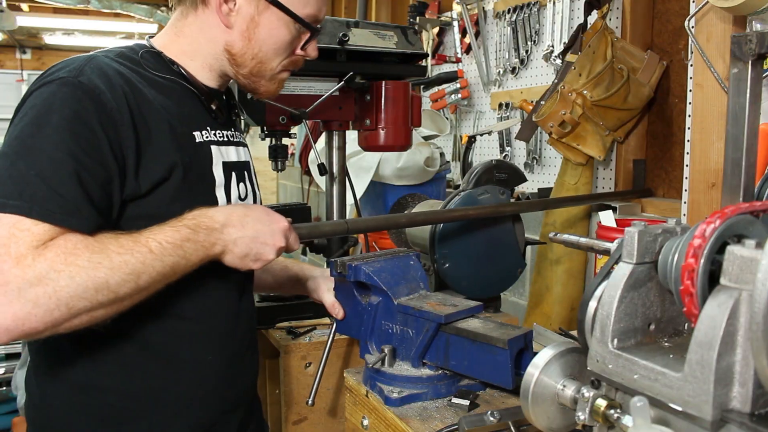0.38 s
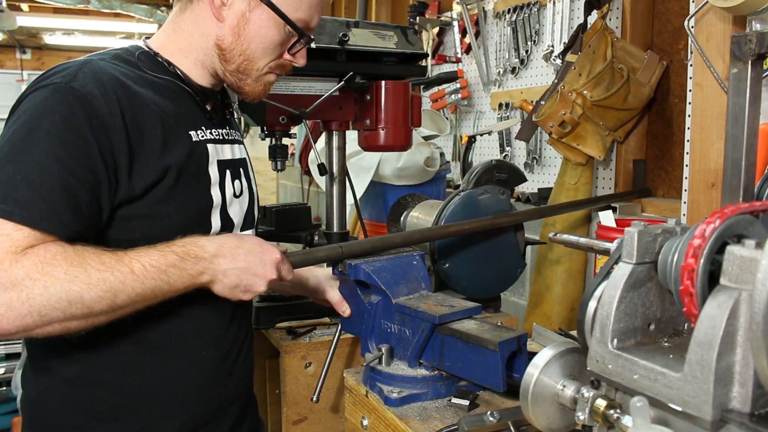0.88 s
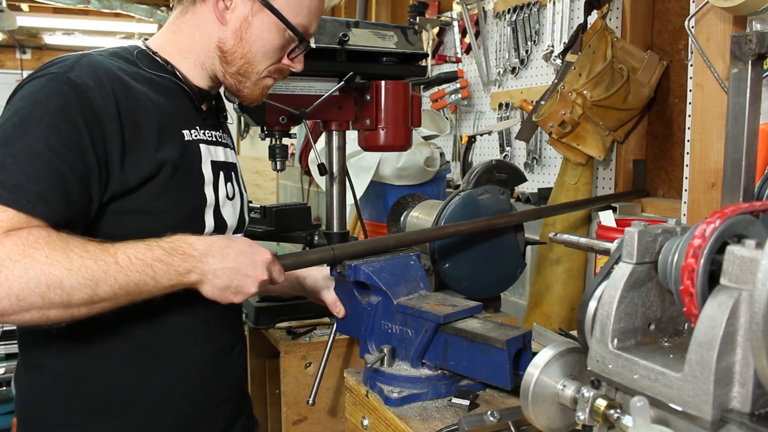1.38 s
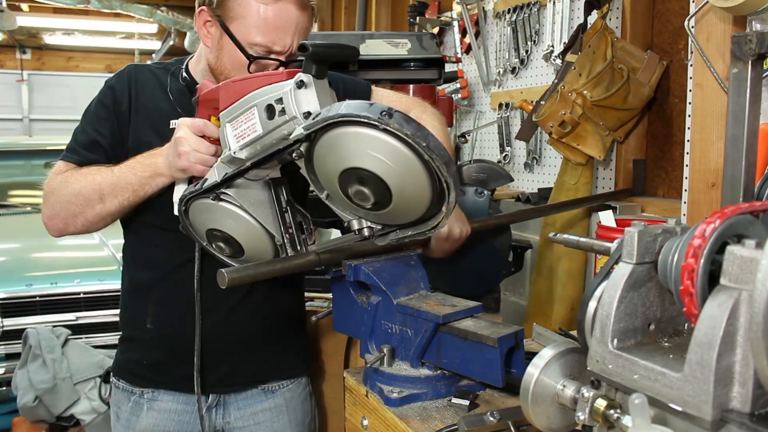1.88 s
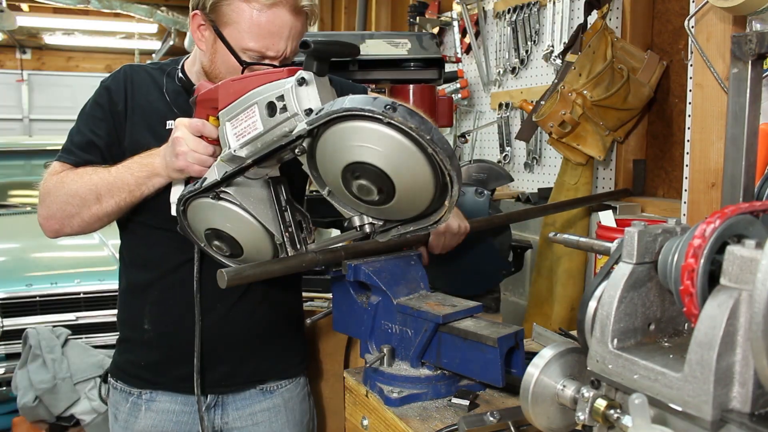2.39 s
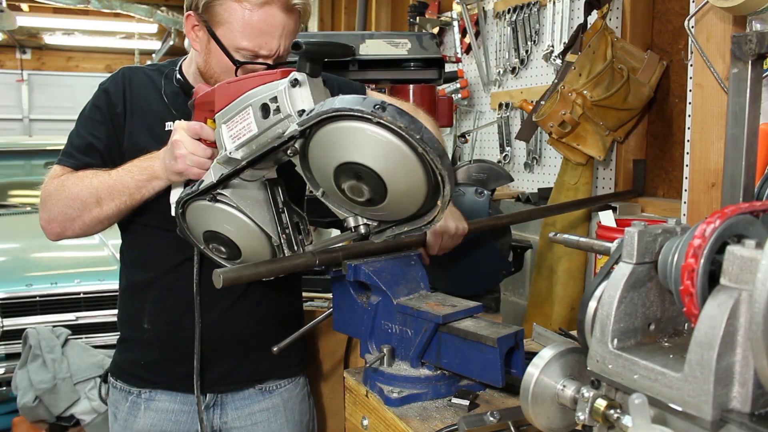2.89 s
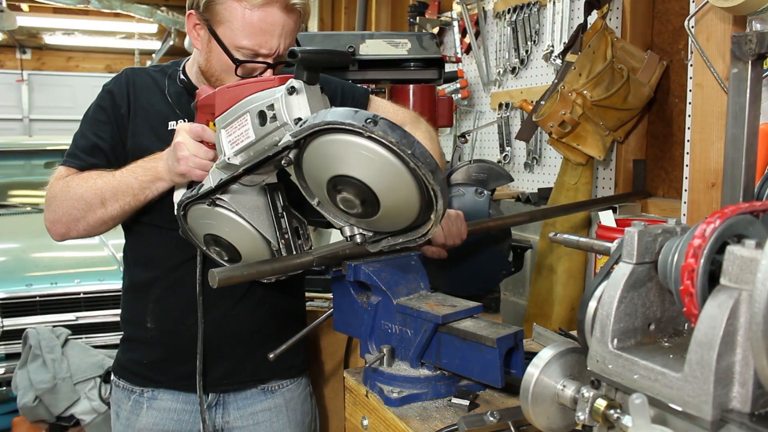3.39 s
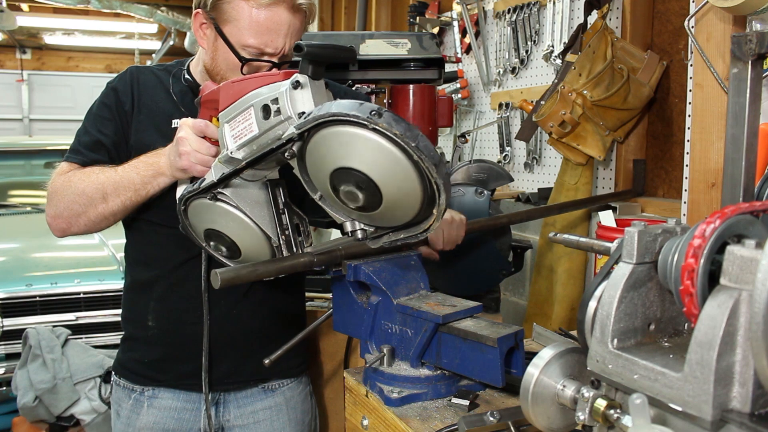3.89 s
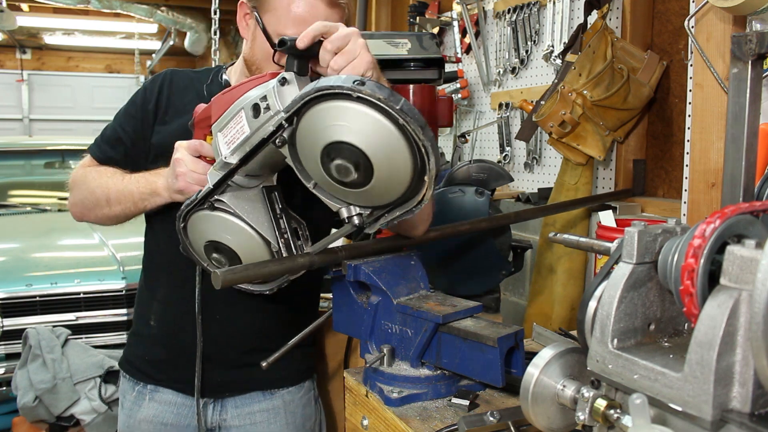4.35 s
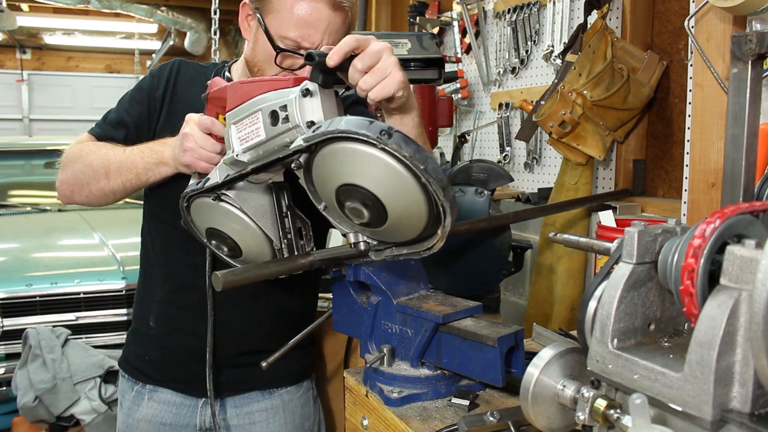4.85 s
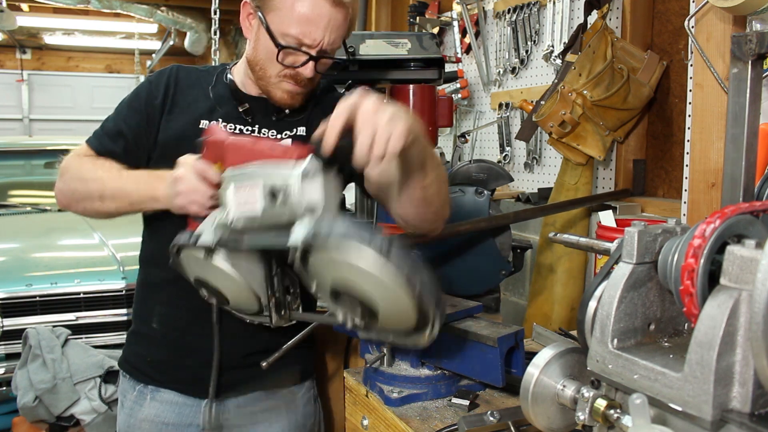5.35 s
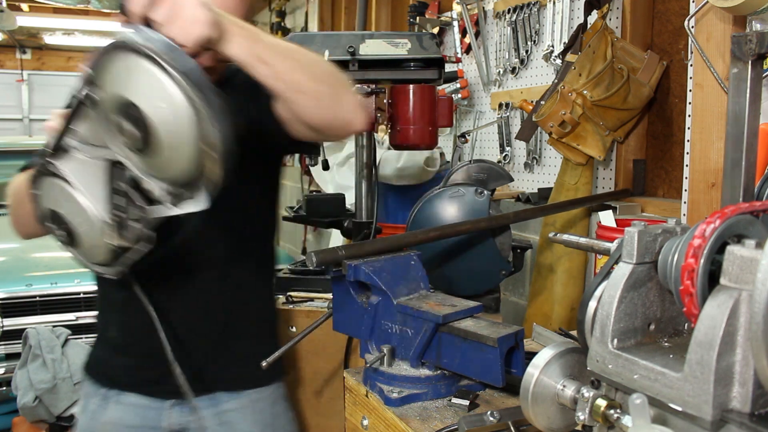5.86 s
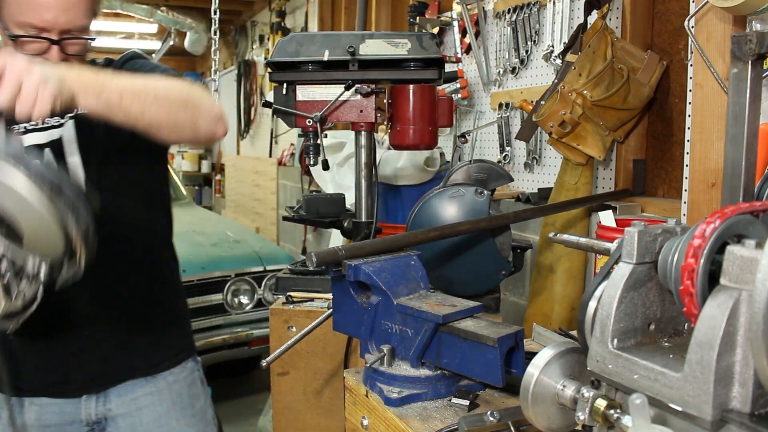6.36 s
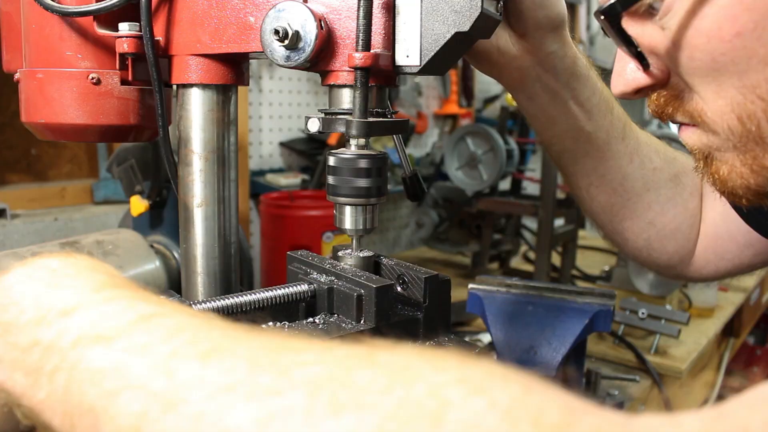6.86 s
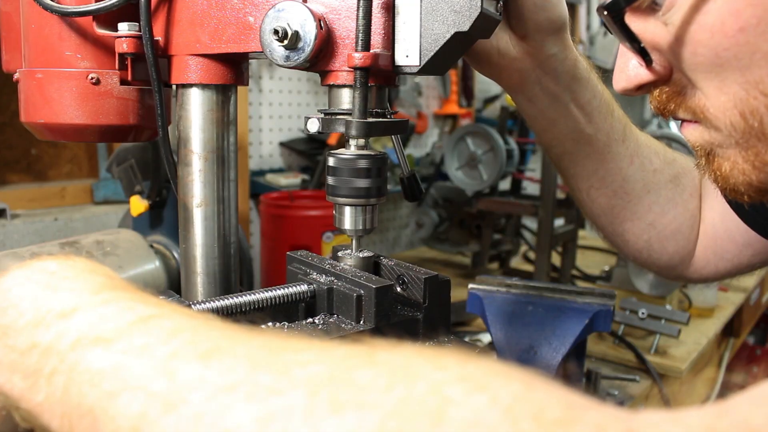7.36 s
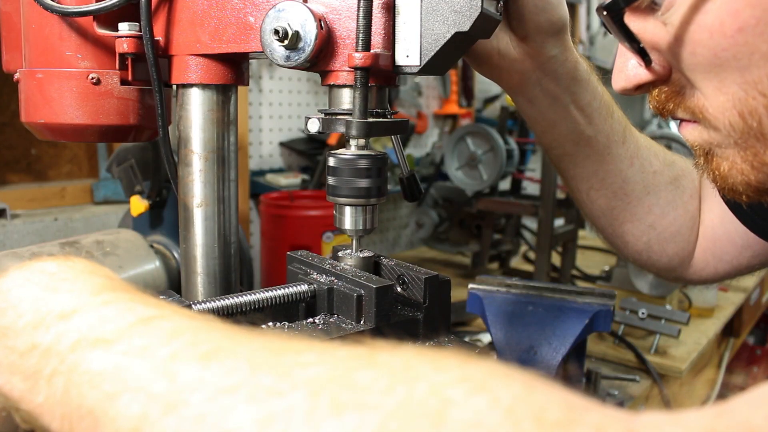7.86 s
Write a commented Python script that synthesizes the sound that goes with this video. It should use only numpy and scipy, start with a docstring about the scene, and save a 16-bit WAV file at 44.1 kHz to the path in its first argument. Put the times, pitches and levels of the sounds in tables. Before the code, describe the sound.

Metal knocks in a quiet workshop, shrill fast-forward sawing, a saw winding down with a ringing bar, then a steady, rapidly ticking drill press.

```python
"""Inside a workshop, four shots joined by hard cuts. First a steel bar slides and knocks in a vise as it is clamped:
damped modes, short noise bursts and the shop's echo. Then a portable band saw cuts it, heard five times too fast:
shaped noise, gliding gear tones and snatches. At normal speed the saw sings, breaks through, is knocked twice and
coasts to rest, its noise bands fading with the speed. Last a drill press drones and ticks once per motor turn.
The microphone drops the deep bass; left and right differ a little in level and share part of each noise."""
import sys
import numpy as np
from scipy import signal
from scipy.fft import rfft, irfft, next_fast_len
from scipy.io import wavfile
from scipy.ndimage import uniform_filter1d, map_coordinates

SR = 44100
rng = np.random.default_rng(int(sys.argv[2]) if len(sys.argv) > 2 else 0)


def store_wav(level_fs):
    """Save 16-bit WAV to argv[1]."""
    pcm = np.round(np.clip(np.atleast_2d(level_fs), -1, 1) * 32767)
    wavfile.write(sys.argv[1], SR, pcm.T.astype(np.int16))


def attenuation_scalar(level_db):
    """Turn a level in dB into a linear amplitude multiplier (20 dB per decade)."""
    decades = np.asarray(level_db, float) / 20
    return 10 ** decades


N = 363384
T = np.arange(N) / SR

# Every *_SPECTRUM is a relative noise shape: pitch_hz, level_db (per Hz).
# Every *_PEAKS holds resonances over such a bed: pitch_hz, width_hz, level_db (relative).

# starts of the four shots: start_s
SHOT_STARTS = [0, 1.888, 4.757, 6.926]
# left minus right in each shot: level_db
LEFT_LEAN = [-2.5, -1.1, -1.2, -1.65]
# how alike left and right are, one list per shot: pitch_hz, correlation (0 to 1)
LIKENESS = [
    [(100, 0.4), (1000, 0.14), (8000, 0.21)],
    [(600, 0.816), (1650, 0.96), (15000, 0.92)],
    [(300, 0.97), (2000, 0.849), (8000, 0.35)],
    [(200, 0.972), (2000, 0.904), (10000, 0.38)],
]
# time the shop's echo takes to die: pitch_hz, t60_s
SHOP_DECAY = [(100, 0.18), (600, 0.25), (3000, 0.19), (12000, 0.18)]
# mains hum, before a common trim: pitch_hz, then level_db in each of the four shots
MAINS_HUM = [(117, -68, -120, -79, -77), (219, -69.5, -120, -87.5, -68), (580, -120, -88.5, -120, -120)]
# shop and microphone hiss
HISS_SPECTRUM = [(12, -24.5), (20, -7), (234, -12.5), (759, -20), (949, -21), (1910, -22), (2080, -23.5),
                 (2320, -23), (2530, -22), (16000, -36)]
# hiss in the first and third shot: level_db
HISS_LEVELS = [-61, -77]

# drill press: belt and casting drone, whirr, tick
DRONE_SPECTRUM = [(18, -89), (30, -77.5), (170, -2), (225, -9), (262, 5), (340, -2.5), (573, -1.5),
                  (802, -3), (1380, -5), (2600, -17), (3380, -28), (5720, -120)]
DRONE_PEAKS = [(264, 6.9, -7), (291, 4.9, 4), (428, 14, 1.5), (475, 19, 1), (594, 55, 2), (643, 106, 1),
               (714, 25, 3), (942, 83, -2.5), (1030, 21, -1), (1375, 88, -3.5), (1745, 43, -7)]
WHIRR_SPECTRUM = [(1290, -40), (2200, -4.5), (2920, 1.5), (3560, -5), (4310, -5), (7900, -11),
                  (8950, -11.5), (10900, -22), (12700, -23), (16000, -40.5)]
WHIRR_PEAKS = [(3650, 400, 4), (4650, 60, -2), (5440, 60, -1)]
TICK_SPECTRUM = [(1500, -120), (3000, 3), (5500, -4), (7500, -4), (10500, -11.5), (16000, -30)]
TICK_PEAKS = [(8050, 150, -4.5), (8250, 80, 3.5), (8550, 90, 5), (8980, 90, 5), (9290, 80, 4),
              (12650, 840, -12.5)]
# the tick comes and goes: time_s, level_db
TICK_LEVELS = [(6.93, -47), (7.1, -50.5), (7.2, -54), (7.34, -51), (7.42, -43.5), (7.62, -46), (7.82, -58),
               (7.885, -40.5), (7.925, -53), (7.95, -40.5), (8.0, -40.5), (8.16, -47), (8.24, -64)]

# bar sliding or screw turning: middle_s, half_length_s, rumble_db (through the bench), scrape_db
STROKES = [(0.049, .16, -53.5, -54.5), (0.627, 0.11, -62.5, -62), (1.024, 0.16, -50, -59),
           (1.3, 0.5, -53.5, -66), (1.57, 0.23, -53.5, -76)]
BENCH_RUMBLE_SPECTRUM = [(40, -31), (90, 5), (150, 7.5), (340, 7), (480, -3.5), (700, -24.5), (1200, -120)]
SCRAPE_SPECTRUM = [(300, -49.5), (600, -11), (900, 3), (1100, -3.5), (1700, -8.5), (2900, -9), (4500, -20),
                   (8000, -60.5)]
# steel on steel: start_s, clank_db, thud_db, treble_slope_db_per_octave, ringing_db (relative to the clank)
KNOCKS = [(0.840, -17, -43, -8.5, -6), (0.845, -18.5, -28, -4.5, -5), (0.859, -15, -22.5, 1.5, -32),
          (0.871, -21.5, -39.5, -6, -15.5), (0.886, -25.5, -48, -6.5, -25), (0.951, -25, -23.5, -5, -12.5),
          (1.112, -49.5, -37.5, -5.5, -12), (1.234, -31, -37, -9, -14), (1.247, -23.5, -45.5, -3.5, -24),
          (1.466, -31.5, -34.5, -9, -15), (1.55, -46, -31.5, -6, -24), (1.711, -25.5, -37, -5.5, -17),
          (5.759, -13.5, -37, -20.5, -18), (5.767, -24.5, -25.5, -4.5, -17.5), (5.778, -29, -30, -6.5, -18),
          (6.006, -23.5, -35, 1, -22), (6.015, -34.5, -63, -0.5, -19), (6.098, -42, -41.5, -4, -16.5)]
# ringing of bar and jaws: pitch_hz, level_db (relative), t60_s
STEEL_MODES = [(560, -3, .1), (752, -3, .09), (1050, -6, .2), (1450, -12, .15), (1597, -4, .16),
               (1916, -15, .15), (2934, -16, .14), (4140, -12, .14), (4365, -15, .32), (5110, -16, .22),
               (5900, -16, .33), (6530, -21, .12)]
# thump of the bench: pitch_hz, level_db (relative), t60_s
BENCH_MODES = [(95, -21, 0.025), (149.7, -6.5, 0.098), (209.2, -5.5, 0.13), (255.8, -1.5, 0.069),
               (339.4, 4.5, 0.044), (436, -4, 0.05)]
CLANK_SPECTRUM = [(120, -60.5), (300, -16), (600, -0.5), (1060, -5), (1570, -7), (2280, -9), (4250, -14.5),
                  (8000, -34), (15000, -54.5)]

# free end of the cut bar, a close pair of modes: start_s, level_db, beat_hz, t60_s
PINGS = [(5.759, -25.5, 7.5, 0.99), (6.004, -19, 12.7, 0.28)]
# saw at normal speed: the singing bar, then wheels, gears and fan
SINGING_SPECTRUM = [(470, -72), (800, -8.5), (898, -7), (1300, 0.5), (1900, -14), (2470, -37), (4180, -120)]
SINGING_PEAKS = [(969, 36, 0), (1077, 10.5, 4.5), (1288, 8, 5), (1358, 21, 2.5), (1590, 12, -5),
                 (1630, 10, 2.5)]
WHEEL_SPECTRUM = [(100, -65), (260, -27), (445, -8.5), (520, -10), (667, 5.5), (822, -5.5), (900, -13.5),
                  (1170, -32.5), (1980, -120)]
GEARBOX_SPECTRUM = [(1030, -78), (1750, -5.5), (2180, -4), (2370, 1.5), (3460, -9.5), (4300, -10),
                    (5590, -27), (9460, -120)]
GEARBOX_PEAKS = [(2053, 30, 1), (2310, 9.6, 18.5), (2460, 27, -9), (2460, 13, 7), (2810, 19, 13),
                 (3050, 30, 6), (3180, 24, 2.5), (3680, 40, -8)]
FAN_SPECTRUM = [(2350, -13), (4000, -1), (4260, -2), (4620, -2.5), (6290, -0.5), (6820, -4), (8400, -5.5),
                (12500, -18), (16000, -34.5)]
# the wheels rock back twice: time_s, level_db
WHEEL_ROCKS = [(6.815, -74), (6.862, -72)]

# fast sawing, the motor sags under load and recovers: time_s, gear_whine_hz
WHINE_PITCH = [(1.9, 4630), (2.13, 4450), (2.25, 4830), (2.47, 5010), (2.62, 4940), (2.72, 5110),
               (2.87, 5020), (2.95, 5120), (3.15, 5150), (3.25, 4920), (3.32, 4630), (3.43, 4610),
               (3.49, 4310), (3.53, 4640), (3.6, 4350), (3.68, 4330), (3.73, 4810), (3.79, 4630),
               (3.85, 4660), (3.92, 5060), (4.06, 4680), (4.14, 5070), (4.3, 5330), (4.42, 5290),
               (4.5, 4620), (4.66, 4520), (4.75, 4580)]
# whine tones: multiple (of the whine pitch), level_db (relative), flicker_db (scales a random curve)
GEAR_ORDERS = [(1.005, 0, 1.5), (2.13, 0, 6), (2.4, -6, 6), (2.76, -6, 6), (3.035, 0, 5)]
# saw resonances that a whine order meets: pitch_hz, width_hz, level_db
WHISTLES = [(5050, 700, -55.5), (9750, 300, -47), (10800, 450, -42), (12250, 250, -37), (13150, 450, -41),
            (14000, 500, -45)]
# blade resonances that squeal: pitch_hz, level_db, loudest_s, span_s (8 dB down this far away)
SQUEALS = [(9900, -52, 2.5, .5), (10350, -47, 2.7, .6), (12250, -45, 2.2, .3), (12700, -47, 3.3, .3),
           (13050, -48, 4.55, .35), (14150, -49, 2.15, .2), (12200, -49, 4.4, .5), (10650, -49, 4.3, .2),
           (6600, -53, 4.2, .4), (13700, -50, 3.0, .5)]
# push of the blade, heard as teeth biting: time_s, level_db (swings are scaled for each layer)
BLADE_PUSH = [(1.92, -39.5), (2.04, -39.5), (2.66, -39), (2.72, -34), (2.83, -40), (2.95, -32.5),
              (3.02, -37), (4.28, -36.5), (4.64, -35.5), (4.75, -39.5)]
# the blade snatches at the bar: start_s, level_db (before the resonances)
SNATCHES = [(1.889, -15), (1.9987, -15), (2.1006, -17.5), (2.1531, -23), (2.1807, -23), (2.211, -15.5),
            (2.3935, -26.5), (2.4953, -25), (2.5942, -25.5), (2.6924, -22.5), (2.745, -22), (2.7818, -18),
            (2.8583, -28), (2.9888, -24), (3.1294, -21), (3.2915, -17), (3.3288, -21), (3.4085, -19.5),
            (3.5446, -18.5), (3.7333, -14), (3.9436, -21), (3.993, -24), (4.05, -25), (4.105, -25)]
# what a snatch shakes: pitch_hz, width_hz, level_db
JOLT_MODES = [(894, 310, -13.5), (1290, 138, -1.5), (2232, 220, 2), (2382, 290, -1.5), (3240, 480, -7.5),
              (4740, 890, -20)]
ROAR_SPECTRUM = [(1590, -62), (2700, -28), (3100, -19.5), (4330, -17), (5570, -12.5), (6420, 1.5),
                 (7420, -8), (9200, -9.5), (12000, -47), (20200, -120)]
ROAR_PEAKS = [(3710, 170, -11.5), (5220, 84, -28.5), (5520, 560, -6), (7040, 290, -2), (7860, 160, -2.5),
              (8440, 160, 0)]
TEETH_SPECTRUM = [(7000, -51), (8800, -21.5), (9800, -2), (11500, -3), (12500, 1.5), (14500, -3),
                  (15600, -5), (16000, -42.5)]
TEETH_PEAKS = [(9900, 200, -3), (10400, 250, -2), (10850, 250, -1), (12250, 250, 3), (12700, 200, 1),
               (13050, 200, 2), (14100, 300, 1), (14700, 250, 0)]
FRAME_SPECTRUM = [(180, -70), (300, -51), (525, -43.5), (589, -25.5), (739, -34.5), (920, -2), (1050, -17),
                  (1330, -4.5), (1590, -5.5), (1720, -20), (2060, -1.5), (2690, -11), (2900, -8),
                  (3770, -34.5), (6380, -120)]


def unit(x):
    """Scaled to rms 1."""
    return x / np.sqrt(np.mean(x ** 2) + 1e-20)


def along(points, hz):
    """Values of (Hz, value) points, joined on a log frequency axis."""
    point_hz, value = np.transpose(points)
    return np.interp(np.log(hz + 1), np.log(point_hz + 1), value)


def curve(rows, t):
    """The second column of rows, joined over time."""
    time_s, value = np.transpose(rows)
    return np.interp(t, time_s, value)


def wobble(rate, size):
    """A smooth random curve, rate knots a second."""
    knots = rng.standard_normal(int(size * rate / SR) + 4)
    return map_coordinates(knots, [np.arange(size) * rate / SR])


def filtered(x, response):
    """x times a complex response of frequency."""
    n = x.shape[-1]
    m = next_fast_len(n + 8192)
    return irfft(rfft(x, m) * response(np.fft.rfftfreq(m, 1 / SR)), m)[..., :n]


def resonances(modes):
    """Causal response of (Hz, width Hz, dB) modes with alternating sign."""
    def response(f):
        total = 0
        for k, (c, width, db) in enumerate(modes):
            total = total + (-1) ** k * attenuation_scalar(db) * 1j * f * width / (c * c - f * f + 1j * f * width)
        return total
    return response


def rush(shot, t, spectrum, peaks=(), bed_db=0, patchy_db=1.0):
    """Stereo noise of rms 1: a smooth bed plus resonant peaks, patchy in gain, with that shot's likeness."""
    z = signal.stft(rng.standard_normal((2, len(t))), nperseg=512)[2]
    patches = uniform_filter1d(rng.standard_normal(z.shape[1:]), size=5, axis=0)
    patches = uniform_filter1d(patches, size=8, axis=1)
    pair = signal.istft(z * attenuation_scalar(patchy_db * unit(patches)), nperseg=512)[1][:, :len(t)]

    def mid_side(f):
        power = attenuation_scalar(along(spectrum, f) + bed_db) ** 2
        for c, width, db in peaks:
            power = power + attenuation_scalar(db) ** 2 / (1 + (2 * (f - c) / width) ** 2) ** 2
        # this angle between mid and side gives the wanted correlation
        turn = np.arccos(np.clip(along(LIKENESS[shot], f), -1, 1)) / 2
        return np.sqrt(power) * [np.cos(turn), np.sin(turn)]

    mid, side = filtered(pair, mid_side)
    return unit(np.array([mid + side, mid - side]))


def room(x, wet_db):
    """A short sound plus the shop's answer, each frequency dying at its own speed."""
    hz, t, z = signal.stft(rng.standard_normal((2, SR // 3)), SR, nperseg=256)
    decay = attenuation_scalar(-60 * t / along(SHOP_DECAY, hz)[:, None])
    tail = signal.istft(z * decay, SR, nperseg=256)[1]
    tail = tail[0] * .75 + tail * 0.47  # both sides of the microphone hear much the same walls
    tail = tail / np.linalg.norm(tail[0])
    late = np.pad(x, (200, 0))  # the echo starts 200 samples late
    wet = signal.fftconvolve(late[None], tail, axes=1)[:, :len(x)]
    return x + attenuation_scalar(wet_db) * wet


def ring(modes, t, spread_db):
    """Damped modes at new strengths for each blow."""
    out = np.zeros(len(t))
    for hz, db, t60 in modes:
        out += attenuation_scalar(db + rng.normal(0, spread_db) - 60 * t / t60) * np.sin(2 * np.pi * hz * t)
    return out


def mains_hum(shot, t):
    """Steady mains tones, each drifting slightly in level."""
    out = np.zeros(len(t))
    for hz, *levels in MAINS_HUM:
        out += attenuation_scalar(levels[shot] - 2.0 + wobble(5.7, len(t))) * np.sin(2 * np.pi * hz * t)
    return out


def drill_press(t):
    """Belt and casting drone as resonant noise; a loose part ticks once per motor turn."""
    turn_hz, first_tick_s = 29.6, 6.931
    drone_db, drone_follows = -39, 0.22  # level, and dB gained per dB of tick
    whirr_db, whirr_follows = -52, 0.14
    tick_db = curve(TICK_LEVELS, t)
    swing_db = tick_db - tick_db.mean()
    turns = (t - first_tick_s) * turn_hz
    size = attenuation_scalar(2.0 * rng.standard_normal(64))[np.clip(turns, 0, 63).astype(int)]  # a new size each turn
    since = turns % 1 / turn_hz
    tick = size * np.exp(-since / 0.013) * (1 - np.exp(-since / 0.00052))
    drone = attenuation_scalar(drone_db + drone_follows * swing_db + 1.5 * wobble(60.07, len(t)))
    drone = drone * (1 + 0.43 * tick)  # each tick shakes the drone
    drone = drone * rush(3, t, DRONE_SPECTRUM, DRONE_PEAKS, bed_db=-2, patchy_db=.5)
    whirr = attenuation_scalar(whirr_db + whirr_follows * swing_db)
    whirr = whirr * rush(3, t, WHIRR_SPECTRUM, WHIRR_PEAKS, bed_db=-3)
    ticks = attenuation_scalar(tick_db) * tick * rush(3, t, TICK_SPECTRUM, TICK_PEAKS)
    return drone + whirr + ticks


def handling(t):
    """The bar slides and the screw turns, swells of friction noise over the quiet shop."""
    edge_db = 20.5  # a stroke is down by this at either end
    rumble_power, scrape_power = 0, 0
    for middle_s, half_s, rumble_db, scrape_db in STROKES:
        swell = attenuation_scalar(-edge_db * ((t - middle_s) / half_s) ** 2)
        rumble_power = rumble_power + (attenuation_scalar(rumble_db) * swell) ** 2
        scrape_power = scrape_power + (attenuation_scalar(scrape_db) * swell) ** 2
    rumble = np.sqrt(rumble_power) * rush(3, t, BENCH_RUMBLE_SPECTRUM, [(340, 30, 4), (470, 30, 1)])
    scrape = np.sqrt(scrape_power) * rush(2, t, SCRAPE_SPECTRUM, patchy_db=1.5)
    return rumble + scrape + attenuation_scalar(HISS_LEVELS[0]) * rush(0, t, HISS_SPECTRUM)


def knocks():
    """Each contact thumps the bench, rings the steel and clatters briefly, and the shop answers."""
    contact_s = 0.0063  # decay time of the clatter
    out, t = np.zeros((2, N + SR)), T[:SR // 2]
    for s, clank_db, thud_db, slope_db, ring_db in KNOCKS:
        def tilt(f):
            # the slope runs for an octave and a half above 1500 Hz
            return attenuation_scalar(slope_db * np.clip(np.log2(f / 1500 + 1e-9), 0, 1.5))

        push = np.exp(-t / contact_s) * (1 - np.exp(-7 * t / contact_s)) * rng.standard_normal(len(t))
        clatter = filtered(push, lambda f: attenuation_scalar(along(CLANK_SPECTRUM, f)) * tilt(f))
        clatter /= np.abs(clatter).max()
        tilted = [(hz, level + 20 * np.log10(tilt(hz)), t60) for hz, level, t60 in STEEL_MODES]
        steel = ring(tilted, t, spread_db=1.5)
        thud = ring(BENCH_MODES, t, spread_db=0.0) * (1 - np.exp(-t / 0.0034))
        blow = attenuation_scalar(clank_db) * (clatter + attenuation_scalar(ring_db) * steel) + attenuation_scalar(thud_db) * thud
        at = round(s * SR)
        out[:, at:at + len(t)] += room(blow, wet_db=1)
    return out[:, :N]


def ping(t):
    """Two close modes of the bar's free end, struck in opposition, swell and beat as they die."""
    centre_hz = 4655
    out = np.zeros(len(t))
    for s, db, beat_hz, t60 in PINGS:
        since = np.clip(t - s, 0, None)
        lower = np.cos(2 * np.pi * (centre_hz - beat_hz / 2) * since)
        upper = np.cos(2 * np.pi * (centre_hz + beat_hz / 2) * since)
        out += (t > s) * attenuation_scalar(db - 60 * since / t60) * (lower - .72 * upper) / 2
    return out * attenuation_scalar([[2.5], [-2.5]])  # stronger on the left


def coasting_saw(t):
    """The bar sings until the blade is through; then friction slows wheels, gears and fan evenly to rest."""
    through_s, off_s, rest_s = 5.32, 5.5, 6.68  # blade through, trigger let go, wheels still
    wheel_runs_on_s = 0.037  # the idler wheel stops last
    speed = np.clip((rest_s - t) / (rest_s - off_s), 0, 1)
    cutting = np.clip((through_s - t) / 0.018, 0, 1)

    sing = cutting * attenuation_scalar(-34.5) * attenuation_scalar(wobble(9.4, len(t)))
    out = sing * rush(2, t, SINGING_SPECTRUM, SINGING_PEAKS, bed_db=-8.0)
    free_blade = (1 - cutting) * attenuation_scalar(-40) * speed
    out += free_blade * rush(2, t, SINGING_SPECTRUM, [(1280, 57, 3), (1450, 60, 2.4)], patchy_db=1.5)

    wheel = attenuation_scalar(-43) * speed ** 1.19
    wheel = wheel + attenuation_scalar(-79.5) * np.clip((rest_s + wheel_runs_on_s - t) / .05, 0, 1)
    for s, db in WHEEL_ROCKS:
        wheel = wheel + attenuation_scalar(db - 12 * ((t - s) / 0.017) ** 2)
    out += wheel * attenuation_scalar(1.1 * wobble(9.7, len(t))) * rush(2, t, WHEEL_SPECTRUM, [(683, 42, 7.7)])

    bench = attenuation_scalar(-64.5) * np.clip((5.42 - t) / 0.077, 0, 1)  # the cut shakes the bench
    out += bench * rush(3, t, BENCH_RUMBLE_SPECTRUM)
    out += attenuation_scalar(-37) * speed ** 1.32 * rush(2, t, GEARBOX_SPECTRUM, GEARBOX_PEAKS, bed_db=6)
    fan = attenuation_scalar(-41) * speed ** 1.61 * attenuation_scalar(0.6 * wobble(12.2, len(t)))
    out += fan * rush(2, t, FAN_SPECTRUM, [(4800, 75, -1), (6070, 200, -1.7)])
    return out + ping(t) + attenuation_scalar(HISS_LEVELS[1]) * rush(0, t, HISS_SPECTRUM, patchy_db=0.0)


def whine(t, push_db):
    """Gear orders glide with the motor and whistle as they cross resonances; the blade squeals now and then."""
    follows, grows_db_per_s = 1.1, 2.2  # upper orders: dB per dB of push, and growth through the cut
    hz = uniform_filter1d(curve(WHINE_PITCH, t), size=900)
    phase = 2 * np.pi * np.cumsum(hz * (1 + .0035 * wobble(40, len(t)))) / SR
    out = np.zeros(len(t))
    upper_db = follows * push_db + grows_db_per_s * (t - t.mean())
    for order, order_db, flicker_db in GEAR_ORDERS:
        gain = sum(attenuation_scalar(db) / (1 + (2 * (order * hz - c) / width) ** 2) for c, width, db in WHISTLES)
        level_db = order_db + (order > 2) * upper_db + flicker_db * wobble(30, len(t))
        out += gain * attenuation_scalar(level_db) * np.sin(order * phase)
    for centre_hz, db, loudest_s, span_s in SQUEALS:
        turns = np.cumsum(centre_hz * (1 + .004 * wobble(60, len(t)))) / SR
        level_db = db - 8 * ((t - loudest_s) / span_s) ** 2 + 5 * wobble(22, len(t))
        out += attenuation_scalar(level_db) * np.sin(2 * np.pi * turns)
    # the whine's slow shaft order shows while the cut is heaviest
    shaft_db = -67 - 6 * ((t - 3.1) / .4) ** 4 + 7 * wobble(45, len(t))
    out += attenuation_scalar(shaft_db) * np.sin(.264 * phase + 1.6 * wobble(40, len(t)))
    return out


def snatching(t, calm_db):
    """Short noise bursts shake the saw's resonances as the blade snatches; between them the frame chatters."""
    treble_db = -12.5  # of the treble burst, relative to the low one
    low, high = np.zeros((2, len(t)))
    size = 1500  # samples in a burst
    fade = np.exp(-T[:size] / .008) * (1 - np.exp(-T[:size] / 0.002))
    for s, db in SNATCHES:
        at = max(round((s - t[0]) * SR), 0)
        low[at:at + size] += attenuation_scalar(db) * fade * rng.standard_normal(size)
        high[at:at + size] += attenuation_scalar(db + treble_db) * fade * rng.standard_normal(size)
    # fast and slow wobbles make the chatter come in clumps
    chatter_db = -51.0 + calm_db + 8.7 * wobble(30, len(t)) + 4.3 * wobble(2.4, len(t))
    low += attenuation_scalar(chatter_db) * rng.standard_normal(len(t))
    jolts = attenuation_scalar(-3.5) * filtered(low, resonances(JOLT_MODES))
    jolts += filtered(high, resonances([(6780, 6500, -1.5), (12800, 2600, -0.58)]))
    return filtered(jolts, lambda f: (1j * f / (700 + 1j * f)) ** 6)  # the speed-up leaves no bass


def fast_saw(t):
    """Roar, teeth and frame noise follow the push of the blade, with whine and snatches, all pitched up."""
    roar_db, roar_follows = -43.5, 0.17  # level, and dB gained per dB of push
    frame_db, frame_follows, teeth_follow = -62, .7, .6
    calm_s, calm_depth_db = 4.074, -5  # from here on the frame rattles less
    teeth_db = curve(BLADE_PUSH, t)
    push_db = teeth_db - teeth_db.mean()
    calm_db = calm_depth_db * np.clip((t - calm_s) / .15, 0, 1)
    shake_db = 0.3 * wobble(25, len(t))
    roar = attenuation_scalar(roar_db + roar_follows * push_db + shake_db)
    out = roar * rush(1, t, ROAR_SPECTRUM, ROAR_PEAKS, bed_db=3.5)
    teeth = attenuation_scalar(teeth_db.mean() - .5 + teeth_follow * push_db + shake_db)
    out += teeth * rush(1, t, TEETH_SPECTRUM, TEETH_PEAKS, bed_db=2)
    frame = attenuation_scalar(frame_db + frame_follows * push_db + calm_db + 2.5 * wobble(70, len(t)))
    out += frame * rush(1, t, FRAME_SPECTRUM)
    return out + whine(t, push_db) + snatching(t, calm_db)


def scene():
    """The shots follow one another, each cut off by the next."""
    edges = [round(s * SR) for s in SHOT_STARTS] + [N]
    hits, out = knocks(), np.zeros((2, N))
    for shot, source in enumerate([handling, fast_saw, coasting_saw, drill_press]):
        a, b = edges[shot], edges[shot + 1]
        t = T[a:b]
        sound = source(t) + mains_hum(shot, t)
        if shot in (0, 2):
            sound = sound + hits[:, a:b]
        fade_in = np.clip((t - t[0]) / 0.001, 0, 1)
        out[:, a:b] = sound * fade_in * attenuation_scalar(np.array([[.5], [-.5]]) * LEFT_LEAN[shot])
    return out


def top_cut(x):
    """Nothing passes above the cut-off."""
    return signal.sosfilt(signal.butter(12, 16700, fs=SR, output="sos"), x)


def record(dry):
    """The microphone drops the deep bass: four first-order low cuts at 45 Hz."""
    mix = filtered(dry, lambda f: (1j * f / (45 + 1j * f)) ** 4)
    return top_cut(mix)


dry = scene()
out = record(dry)
store_wav(out)
```